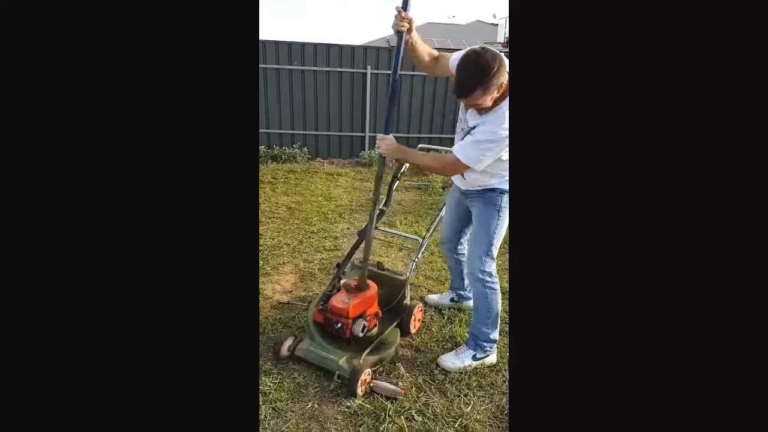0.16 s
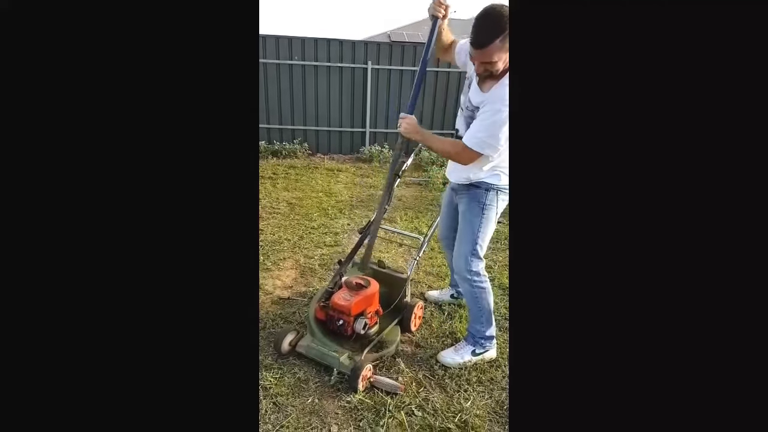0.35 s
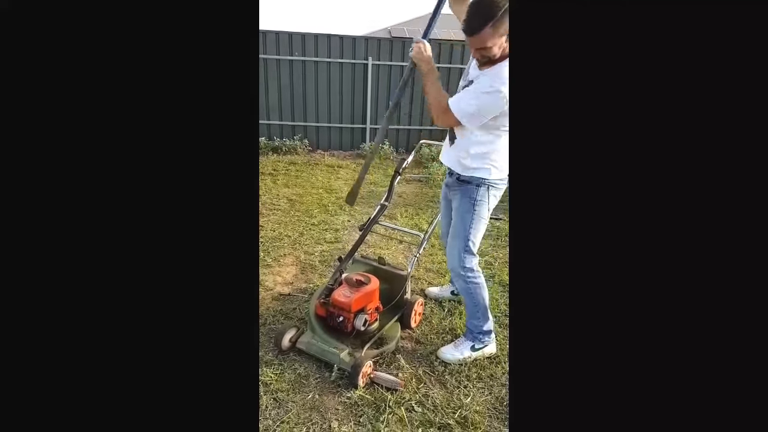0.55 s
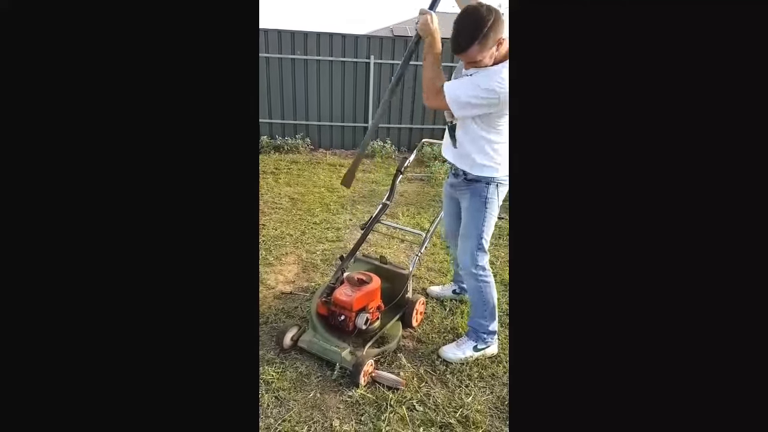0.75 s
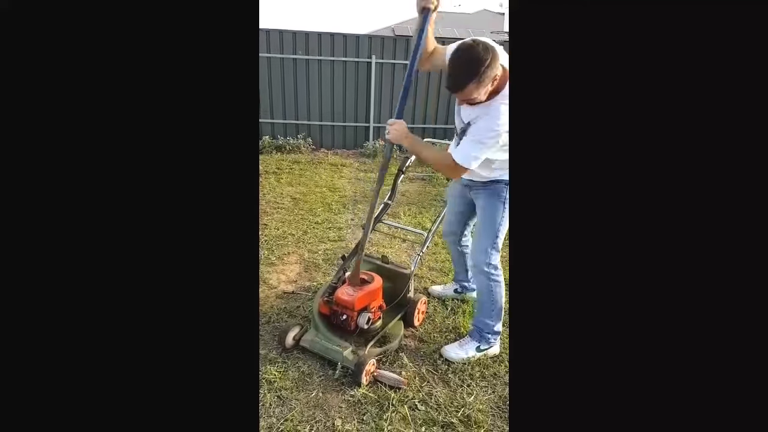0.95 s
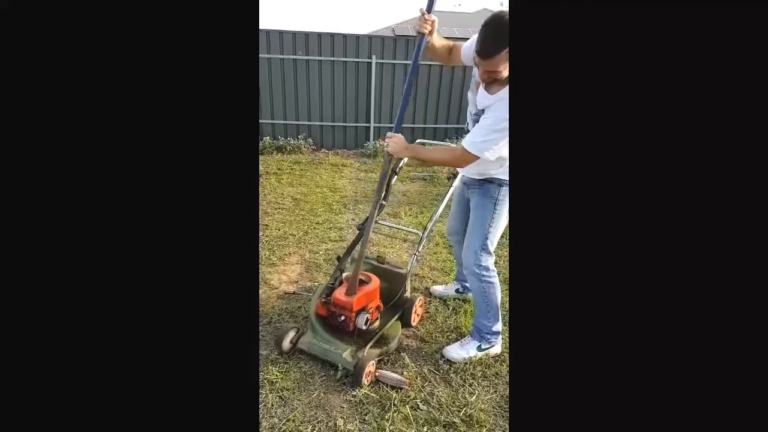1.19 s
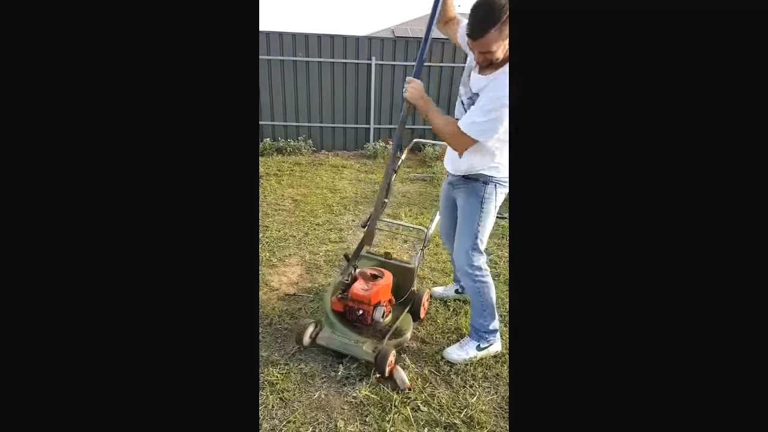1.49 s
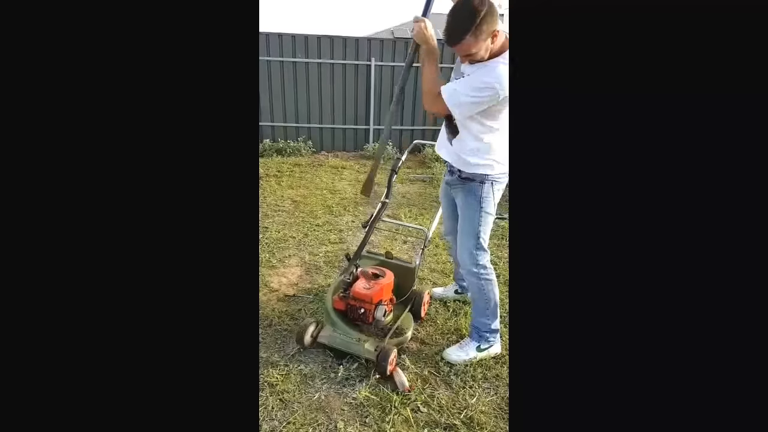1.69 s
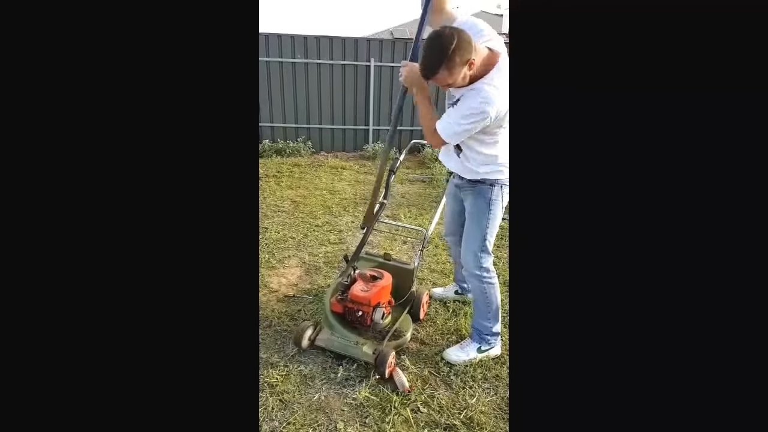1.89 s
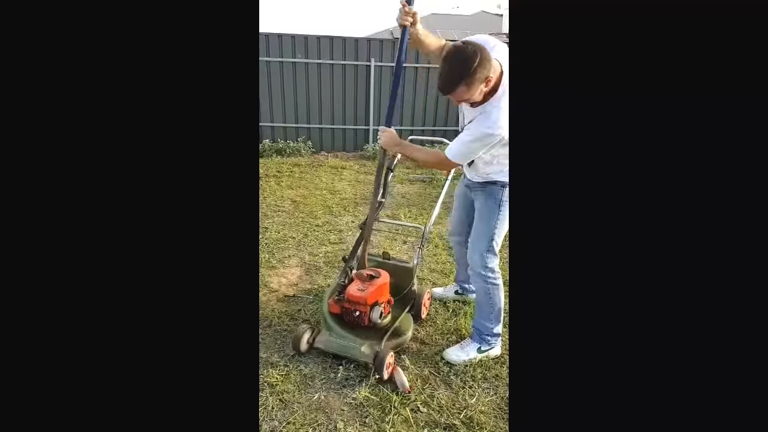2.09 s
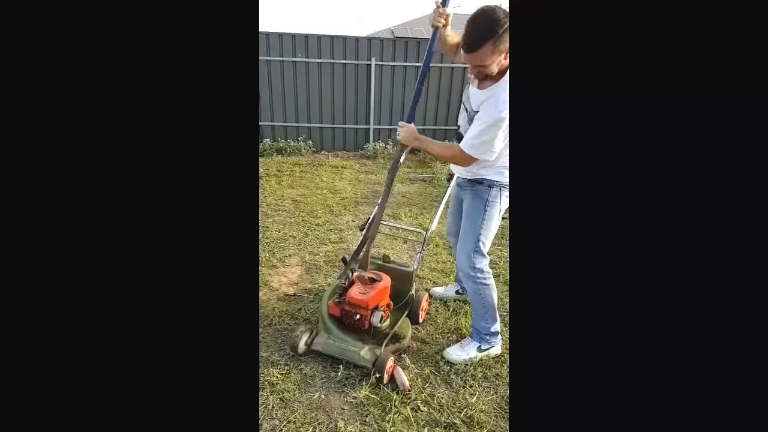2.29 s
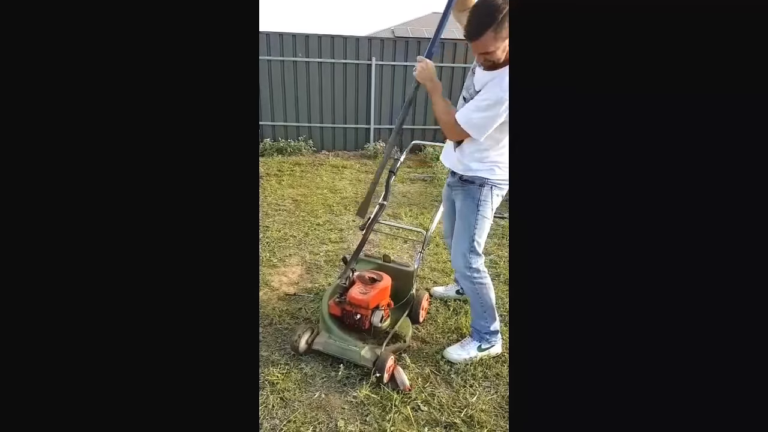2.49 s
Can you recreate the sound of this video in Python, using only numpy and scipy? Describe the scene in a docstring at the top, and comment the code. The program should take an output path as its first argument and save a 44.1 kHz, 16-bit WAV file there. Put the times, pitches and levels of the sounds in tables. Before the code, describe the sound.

Heavy pole blows smash a metal lawnmower three times, loose steel parts clattering and rattling outdoors

```python
"""A long steel bar is driven down on a lawnmower in a backyard. From the start thin sine modes ring faintly, one low in
the deck, the rest in the bar, over wind on two microphone ports and distant hum (filtered noise); loose steel deck,
cowl, handle and small parts clatter (random contacts driving resonances), and a bright noise tick follows. Heavy blows
near 0.22, 1.15 and 2.15 s add low sine thumps and denser knocks as the parts bounce; some knocks ping the handle tube.
Ground and fence answer with a short noise echo. The wind is strongest near 2 s."""
import sys
import numpy as np
from scipy import signal
from scipy.fft import rfft, irfft, next_fast_len
from scipy.io import wavfile
from scipy.ndimage import map_coordinates

SR = 44100
rng = np.random.default_rng(int(sys.argv[2]) if len(sys.argv) > 2 else 0)


def persist_wave(psi):
    """Save psi, clipped to +-1, as 16-bit WAV."""
    counts = np.round(np.clip(psi, -1, 1) * 32767).astype(np.int16)
    wavfile.write(sys.argv[1], SR, np.atleast_2d(counts).T)


def decibels_to_gain(level_db):
    """Convert a level in decibels to a linear amplitude gain (20 dB per decade)."""
    exponent = np.asarray(level_db, float) / 20
    return 10 ** exponent


N = 116865
PORT_LAG_S = 9e-5  # sound reaches the left port later

# single knocks of parts on each other: start_s, relative_level_db, t60_s, deck_db, small_parts_db, cowl_db
PART_KNOCKS = [(0.22, -1, 0.049, 5, -5, 4.5), (0.229, 4.5, 0.095, 0, -5, -0.5),
               (0.26, -12, 0.079, 1, 9.5, 2), (0.28, -11, 0.031, 12.5, 8, -7),
               (0.293, -9.5, 0.039, 9, -8, 10), (0.304, -24, 0.026, 2, -8, 3),
               (0.329, -10, 0.16, 2, -12.5, -7), (0.383, 2, 0.018, -14.5, 0.5, -23),
               (0.461, -37, 0.18, -0.5, -8, 12), (0.495, -11, 0.041, -12, -7, -11.5),
               (0.632, -32.5, 0.037, 6.5, -1, 3.5), (0.685, -40.5, 0.058, 10, 3.5, -4),
               (0.719, -43.5, 0.11, 3, -6, -7), (0.795, -40.5, 0.15, -4, 3, 5),
               (0.899, -41.5, 0.06, 1.5, -11.5, -1.5), (0.979, -44, 0.072, 5, -1, 7),
               (1.062, -47, 0.029, 1, 2.5, -5), (1.143, 2.5, 0.032, -8, -11, 3.3),
               (1.151, 0.5, 0.12, -10, -6, -8), (1.241, -11, 0.081, -10, -4, -18),
               (1.324, -3, 0.12, -3, -7, -22), (1.373, -24, 0.056, 11, 20, -9),
               (1.386, -15, 0.065, -17, -8, -8), (1.521, -21, 0.059, -3.5, -14, -1),
               (1.553, -35, 0.058, 3, 15.5, 8), (1.623, -37.5, 0.16, 12, -14, -13),
               (1.656, -6.5, 0.1, -9.5, 1.5, -7.5), (1.671, -6.5, 0.078, -11, -4.5, -7),
               (1.688, -10, 0.11, -20, -3, -24), (1.744, -11, 0.04, -21, -23, -22),
               (1.755, -43, 0.06, 0.1, 12, 2), (1.828, -43.5, 0.27, -6, 20, -12),
               (1.86, -41, 0.042, 2, -8, 2), (1.883, -39, 0.036, 19, -12, 16),
               (2.043, -24.5, 0.18, -8, -3, 0.5), (2.148, 3.5, 0.075, -9, -1.5, -2.5),
               (2.171, -0.5, 0.04, -18, 4, -3), (2.207, 0.5, 0.095, -19, -4, -14),
               (2.237, -6.5, 0.071, -19, 2.5, -14), (2.269, -1, 0.036, -7, -20, -6),
               (2.287, -3, 0.19, -8.5, -2.5, -4), (2.337, -8, 0.046, 6, 4, -8),
               (2.468, -25.5, 0.24, 0.5, -37, 1.5), (2.488, -36.5, 0.11, 18.5, 10.5, -9),
               (2.546, -38.5, 0.021, 12, -12, 13.5), (2.613, -36.5, 0.14, 4, -21, 2),
               (2.632, -38, 0.048, 11, 6.5, 5)]


def unit(x):
    """Scaled to rms 1."""
    return x / np.sqrt(np.mean(x ** 2) + 1e-20)


def along(points, hz):
    """Interpolates (Hz, value) points on a log frequency axis."""
    f, value = np.transpose(points)
    return np.interp(np.log(hz + 1), np.log(f + 1), value)


def wobble(knots_per_s):
    """Smooth random curve through normal-distributed knots."""
    return map_coordinates(rng.standard_normal(300), [np.arange(N) * knots_per_s / SR])


def filtered(x, response):
    """x through a complex response of frequency."""
    m = next_fast_len(N + SR // 4)
    spectrum = rfft(x, m) * response(np.fft.rfftfreq(m, 1 / SR))
    return irfft(spectrum, m)[..., :N]


def rings(modes, gains_db, f):
    """Causal sum of band-pass resonances with alternating signs, rms response 1."""
    h = 0
    for k, (hz, width_hz, db) in enumerate(modes):
        damping = 1j * f * width_hz
        h = h + (-1) ** k * decibels_to_gain(db + gains_db[k]) * damping / (hz * hz - f * f + damping)
    return h / np.sqrt(np.mean(abs(h) ** 2))


def ports(f, lag_s, path=1):
    """Half the lag on each port, plus a delayed, duller bounce off the lawn."""
    # bounce delay at each port: delay_s
    bounce_s = [0.00031, 0.00037]
    bounce_gain, dull_hz = 0.73, 2470
    bounce = bounce_gain / (1 + (f / dull_hz) ** 2)
    lawn = 1 + bounce * np.exp(-2j * np.pi * f * path * np.array(bounce_s)[:, None])
    return lawn * np.exp(-1j * np.pi * f * lag_s * np.array([[1], [-1]]))


def air():
    """Low lumpy wind noise, independent at each port, over distant hum partly shared by both."""
    # wind level before lumps: time_s, level_db
    wind = [(0, -68), (.2, -68), (0.549, -84), (1.04, -93.5), (1.09, -65.5), (1.25, -74), (1.3, -90),
            (1.4, -66), (1.6, -75), (1.74, -77), (1.78, -54), (1.98, -48), (2.02, -39), (2.1, -50),
            (2.24, -52.5), (2.36, -44), (2.5, -54.5), (2.65, -75)]
    # wind spectrum: freq_hz, relative_db_per_hz
    rumble_colour = [(12, -17.5), (30, -8.5), (70, 5), (120, -0.5), (200, -16), (400, -50), (600, -120)]
    # distant hum spectrum: freq_hz, relative_db_per_hz
    hum_colour = [(20, -48), (100, -16.5), (200, -6), (400, 0), (900, -2.5), (2000, -14.5), (4000, -21),
                  (8000, -26.5), (14000, -35.5)]
    lumps_db, hum_db, hum_side = 2, -65, 0.35
    time_s, wind_db = np.transpose(wind)
    rumble = unit(filtered(rng.standard_normal((2, N)), lambda f: decibels_to_gain(along(rumble_colour, f))))
    mid, side = rng.standard_normal((2, N))
    hum_noise = np.array([mid + hum_side * side, mid - hum_side * side])
    hum = unit(filtered(hum_noise, lambda f: decibels_to_gain(along(hum_colour, f))))
    level_db = np.interp(np.arange(N) / SR, time_s, wind_db) + lumps_db * wobble(16)
    return decibels_to_gain(level_db) * rumble + decibels_to_gain(hum_db) * hum


def faint_ring():
    """Thin ringing modes of deck and bar decay slowly, back to full level at each heavy blow."""
    # one low deck ring at 409 Hz, the rest the steel bar: freq_hz, level_db
    modes = [(409, -62.5), (1922, -77), (2891, -77), (3537, -86), (5146, -75), (5954, -78)]
    # blows that ring them: start_s
    blows_s = [-2, .22, 1.147, 2.149]
    t60_s, waver_db = 24, 3.5
    t = np.arange(N) / SR
    since_s = np.min([np.where(t >= s, t - s, 10) for s in blows_s], axis=0)
    tones = 0
    for hz, db in modes:
        cycles = hz * t + rng.random() + 0.11 * rng.random((2, 1))  # phase differs a little per port
        tones = tones + decibels_to_gain(db + waver_db * wobble(11)) * np.sin(2 * np.pi * cycles)
    return tones * decibels_to_gain(-60 * since_s / t60_s)


def shaking():
    """Contact strength over time for deck, cowl, small parts and handle: powers of decaying bursts add."""
    # blows that set the mower shaking: start_s, rattle_db, hold_s, t60_s, deck_db, small_parts_db
    blows = [(0.0, -54, 0.0067, 0.13, 8, -0.5), (0.216, -18, 0.089, 0.46, -4.5, 1),
             (0.632, -47.5, 0.0094, 0.44, -1, -2.5), (0.789, -54.5, 0.0083, 0.92, 1.5, -9),
             (0.959, -64.5, 0.048, 1, 11.5, -5), (1.141, -20, 0.04, 0.68, 1.5, 3.5),
             (1.301, -29.5, 0.11, 0.23, -3, 4), (1.54, -41.5, 0.0075, 0.49, 2.5, 0.5),
             (1.651, -30, 0.021, 0.71, 0.5, -15), (1.735, -38.5, 0.14, 0.47, 3, -0.5),
             (2.025, -47.5, 0.029, 0.31, 13, -12), (2.145, -20, 0.047, 0.4, 2, 3.5),
             (2.263, -28, 0.12, 0.35, 2, 4.5)]
    rattle_rise_s, knock_rise_s, knock_db = .0015, .001, -9
    decay_rate = np.array([[1], [1], [1.223], [1]])  # treble rattle fades 1.2 times as fast as the rest
    t, power = np.arange(N) / SR, np.zeros((4, N))
    rows = [(s, db, rattle_rise_s, hold_s, t60_s, deck_db, small_db, 0)
            for s, db, hold_s, t60_s, deck_db, small_db in blows]
    rows += [(s, db + knock_db, knock_rise_s, 0, t60_s, deck_db, small_db, cowl_db)
             for s, db, t60_s, deck_db, small_db, cowl_db in PART_KNOCKS]
    for s, db, rise_s, hold_s, t60_s, deck_db, small_db, cowl_db in rows:
        i = round(s * SR)
        u = t[i:i + SR] - t[i]
        decay_db = 60 * np.maximum(u - hold_s, 0) / t60_s * decay_rate
        shape = (1 - np.exp(-u / rise_s)) * decibels_to_gain(db - decay_db)
        power[:, i:i + SR] += (shape * decibels_to_gain([[deck_db], [cowl_db], [small_db], [0]])) ** 2
    return np.sqrt(power)


def small_parts(f, spots):
    """Smooth treble colour with many thin modes scattered over it."""
    # treble of the small parts: freq_hz, relative_db_per_hz
    colour = [(2600, -16.5), (3200, -5.5), (4500, 6.5), (5600, -3.5), (7000, -5), (8800, -5), (11500, -5),
              (14000, -8.5)]
    mode_q, smooth_share = 29, 0.93
    modes_hz = 3000 * 5 ** spots
    modes = rings([(hz, hz / mode_q, 0) for hz in modes_hz], np.zeros(len(modes_hz)), f)
    return unit(decibels_to_gain(along(colour, f))) * (smooth_share + modes)


def mower(count=7):
    """Loose parts take turns; each one's contacts drive resonances of its own tuning, balance and place."""
    # deck resonances: freq_hz, width_hz, relative_db
    deck = [(147.2, 72, -16.5), (176, 59, -15), (262.5, 33.7, -3), (306, 101, -9), (406.2, 30.8, 2),
            (455, 45, -4.5), (515.6, 66, -7.5), (640, 52, -15)]
    # cowl resonances: freq_hz, width_hz, relative_db
    cowl = [(687.5, 50, -4), (826, 110, -0.5), (986, 70, 4), (1104, 60, 5), (1162, 55, 5.5),
            (1316, 250, -5)]
    # handle resonances: freq_hz, width_hz, relative_db
    handle = [(1510, 150, 1.5), (1714, 130, 4), (1861, 170, 1), (2102, 140, 0.5), (2242, 89, -4.5),
              (2360, 220, -5.5), (2518, 140, -4.5), (2685, 73, -8), (2930, 95, -13), (3393, 140, -12)]
    deck_db, cowl_db, handle_db, small_db = -6.5, -3.5, -2, -11.5
    contacts_per_s, contact_scatter_db, hiss_share = 1000, 4.5, .15  # contacts_per_s over all parts
    strike_db, strike_delay_s = 22.5, .001  # first contact of a knock over the rattle
    swap_db, shake_db = 6, 2  # turn taking, unevenness
    fizz_clicks, fizz_apart = 0.49, 0.62  # contacts in the small parts, noise unlike at each port
    balance_scatter_db, detune, lag_scatter_s, path_scatter = 3, .018, 3e-5, .12
    deck_drive, cowl_drive, small_drive, handle_drive = shaking()
    strikes = np.zeros(N)
    strikes[[round((row[0] + strike_delay_s) * SR) for row in PART_KNOCKS]] = decibels_to_gain(strike_db)
    turns = decibels_to_gain(swap_db * np.array([wobble(18) for _ in range(count)]))
    turns = turns / np.linalg.norm(turns, axis=0)
    out = 0
    for turn in turns:
        hits = (rng.random(N) < contacts_per_s / count / SR) * decibels_to_gain(contact_scatter_db * rng.standard_normal(N))
        hits = hits * rng.choice([-1, 1], N)
        # the leading part takes the strike
        strike = strikes * (turn == turns.max(0)) / turn * rng.choice([-1, 1], N)
        contact = np.sqrt(1 - hiss_share) * unit(hits) + strike
        force = contact + np.sqrt(hiss_share) * rng.standard_normal(N)
        force = force * turn * decibels_to_gain(shake_db * wobble(45))
        fizz = fizz_clicks * contact + rng.standard_normal(N) + fizz_apart * rng.standard_normal((2, N))
        fizz = fizz * turn * decibels_to_gain(shake_db * wobble(90))
        gains_db = balance_scatter_db * rng.standard_normal((3, 20))
        spots = rng.random(40)
        tune = 1 + detune * rng.standard_normal()
        lag_s = PORT_LAG_S + lag_scatter_s * rng.standard_normal()
        path = 1 + path_scatter * rng.standard_normal()
        bodies = [(deck, deck_db, deck_drive, gains_db[0] / 2), (cowl, cowl_db, cowl_drive, gains_db[1]),
                  (handle, handle_db, handle_drive, gains_db[2])]
        for modes, db, drive, mode_db in bodies:
            def body(f):
                """Resonances, radiating little below 111 Hz."""
                low_cut = (1j * f / (111 + 1j * f)) ** 3
                return decibels_to_gain(db) * rings(modes, mode_db, f * tune) * low_cut * ports(f, lag_s, path)
            out = out + filtered(force * drive, body)
        out = out + filtered(fizz * small_drive,
                             lambda f: decibels_to_gain(small_db) * small_parts(f, spots) * ports(f, lag_s, path))
    return out


def fence(x):
    """Ground and fence answer: noise echo in which each frequency dies at its own speed."""
    # echo decay: freq_hz, t60_s
    decay = [(200, 0.11), (2000, 0.091), (10000, 0.011)]
    delay_s = .004
    hz, t, z = signal.stft(rng.standard_normal((2, SR // 3)), SR, nperseg=256)
    tail = signal.istft(z * decibels_to_gain(-60 * t / along(decay, hz)[:, None]), SR, nperseg=256)[1]
    delayed = np.pad(x, ((0, 0), (round(delay_s * SR), 0)))
    return signal.fftconvolve(delayed, tail / np.linalg.norm(tail[0]), axes=1)[:, :N]


def tick():
    """Short bright tick: noise under a two-sided exponential, high-passed at 700 Hz."""
    start_s, level_db, width_s = .1095, -34, 0.00077
    u = (np.arange(N) / SR - start_s) / width_s
    burst = decibels_to_gain(level_db) * np.exp(-abs(u)) * rng.standard_normal(N)
    return filtered(burst, lambda f: (f > 700) * ports(f, PORT_LAG_S))


def thump():
    """Wheels driven into the lawn and deck flexing: two decaying low sines at each heavy blow."""
    # heavy blows: start_s, wheels_db, deck_db
    pushes = [(0.221, -24.5, -4.5), (1.149, -36, -20.5), (2.152, -40, -17)]
    wheels_hz, deck_hz, t60_s, rise_s = 130, 263, 0.087, 0.0023
    t, out = np.arange(N) / SR, np.zeros(N)
    for s, wheels_db, deck_db in pushes:
        u = np.maximum(t - s, 0)
        for hz, db in [(wheels_hz, wheels_db), (deck_hz, deck_db)]:
            out += decibels_to_gain(db - 60 * u / t60_s) * (1 - np.exp(-u / rise_s)) * np.sin(2 * np.pi * hz * u)
    return out


def ping():
    """Knocks ring the handle tube: a close pair of briefly decaying sines."""
    # knocks that ring the tube: start_s, level_db
    tube_knocks = [(.383, -20), (.496, -33), (1.522, -28)]
    # modes of the tube: pitch_hz
    tube_hz = [1944, 2120]
    t60_s = 0.06
    t, ring = np.arange(N) / SR, np.zeros(N)
    for s, db in tube_knocks:
        u = np.maximum(t - s, 0)
        for hz in tube_hz:
            ring += decibels_to_gain(db - 60 * u / t60_s) * np.sin(2 * np.pi * hz * u)
    return filtered(ring, lambda f: ports(f, PORT_LAG_S))


def scene():
    """Mower, tick and pings with their echo, plus thump, faint ring and air."""
    pan_db, echo_db = -0.3, -11
    near = (mower() + tick() + ping()) * decibels_to_gain([[pan_db], [-pan_db]])
    return near + decibels_to_gain(echo_db) * fence(near) + thump() + faint_ring() + air()


def top_cut(x):
    """Nothing passes above the cut-off."""
    return signal.sosfilt(signal.butter(12, 15960, fs=SR, output="sos"), x)


def record(dry):
    """Soft ceiling at full scale, then band limit."""
    top_hz, slope_hz = 14950, 300
    soft = dry / (1 + abs(dry) ** 6) ** (1 / 6)
    mix = filtered(soft, lambda f: np.clip((top_hz - f) / slope_hz, 0, 1) ** 2)
    return top_cut(mix)


dry = scene()
out = record(dry)
persist_wave(out)
```